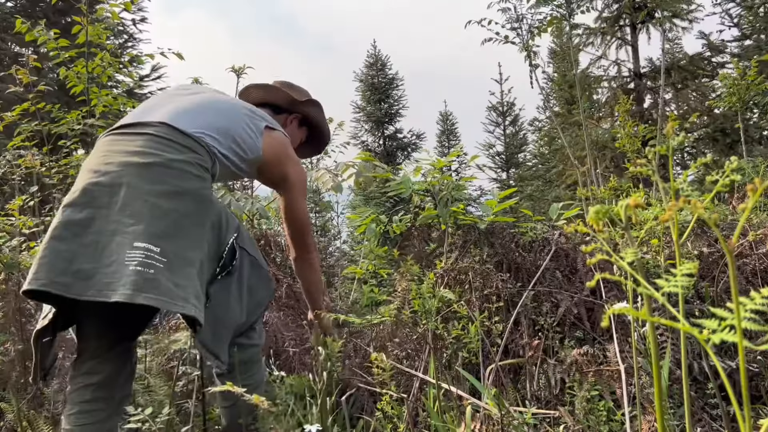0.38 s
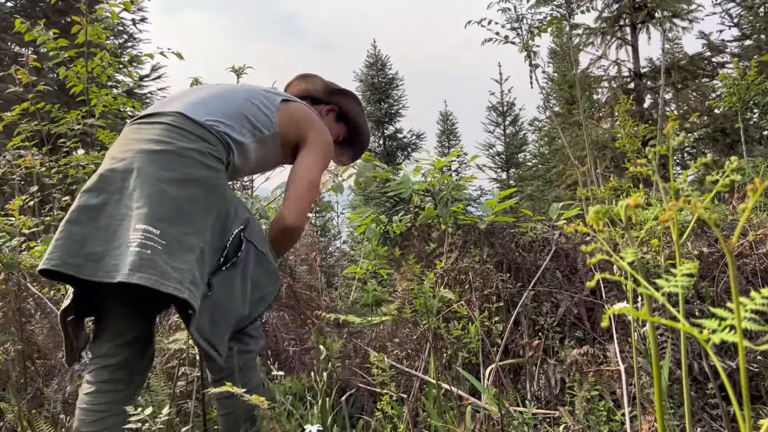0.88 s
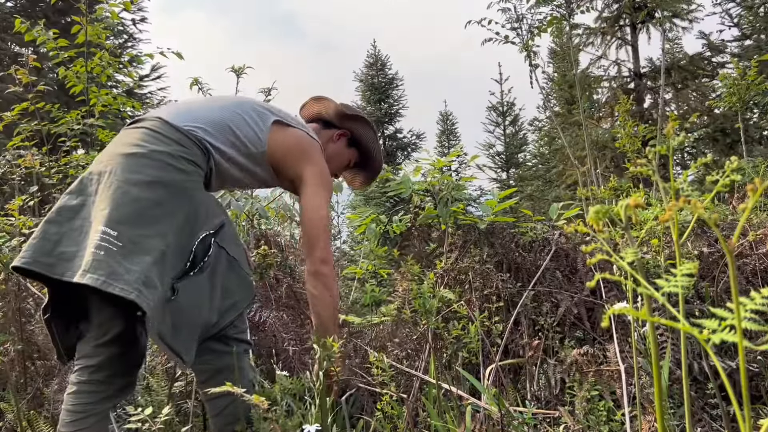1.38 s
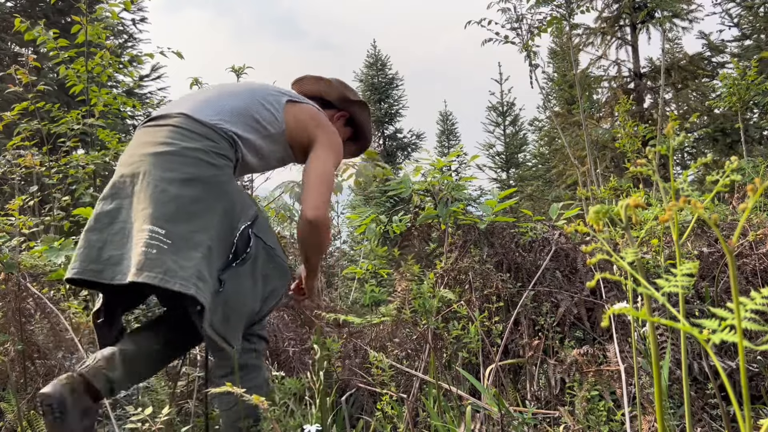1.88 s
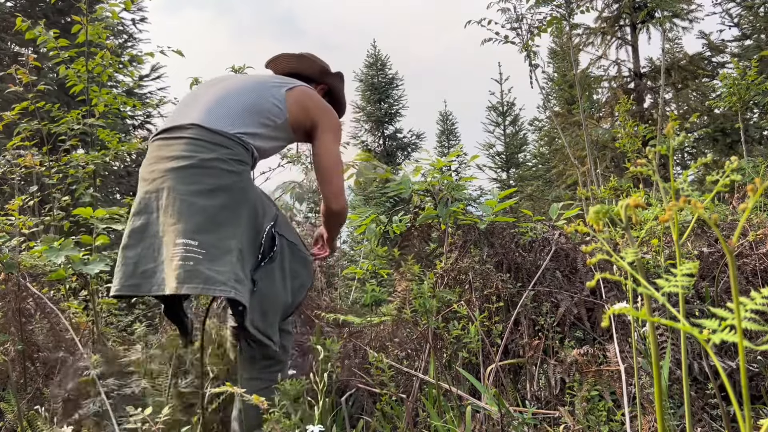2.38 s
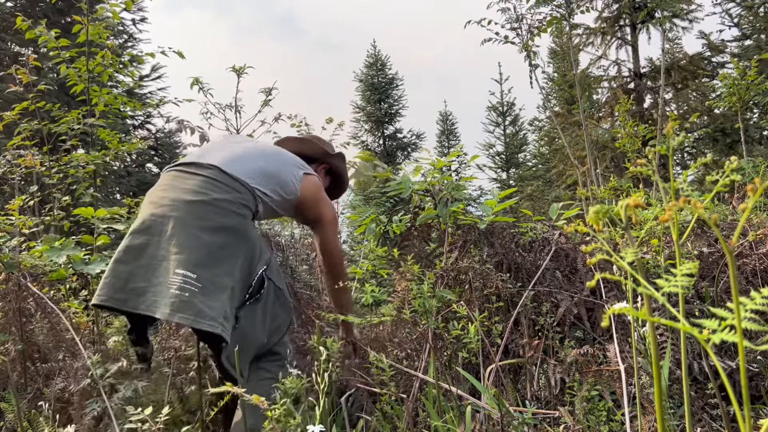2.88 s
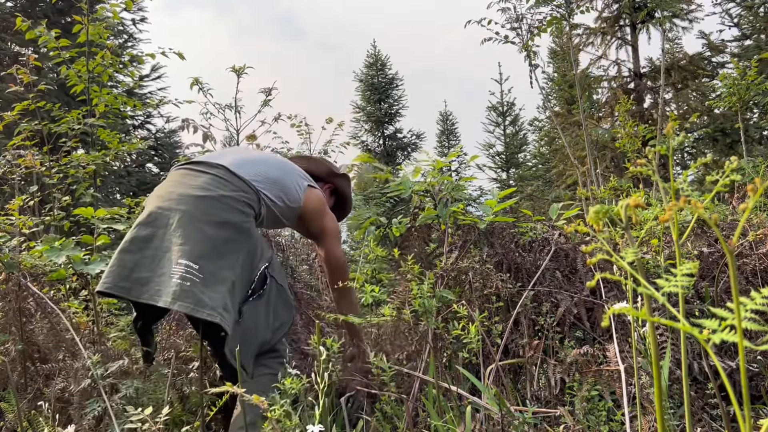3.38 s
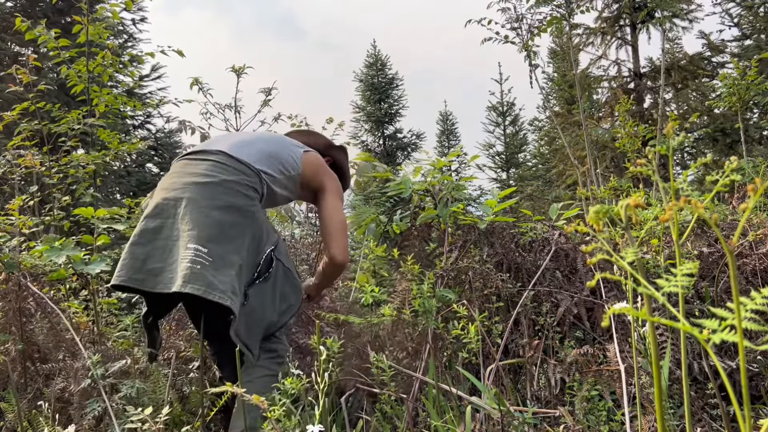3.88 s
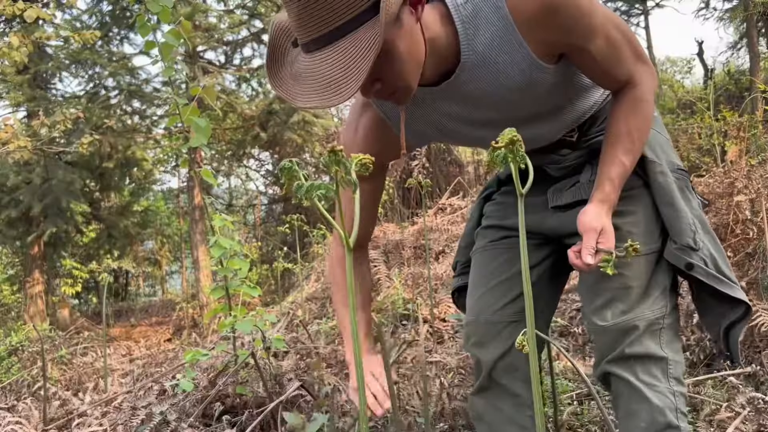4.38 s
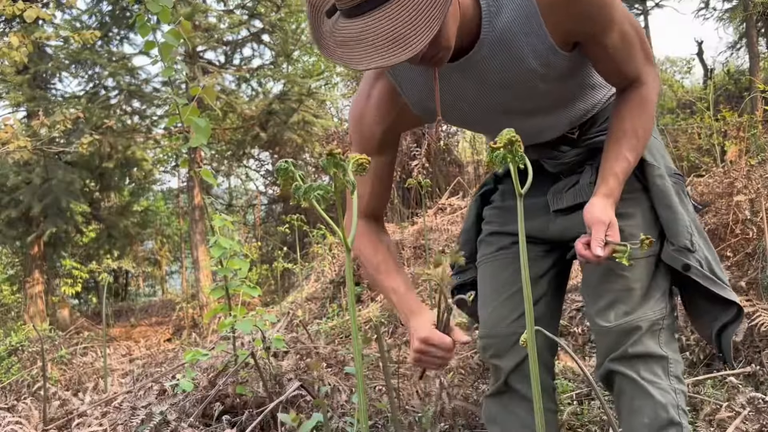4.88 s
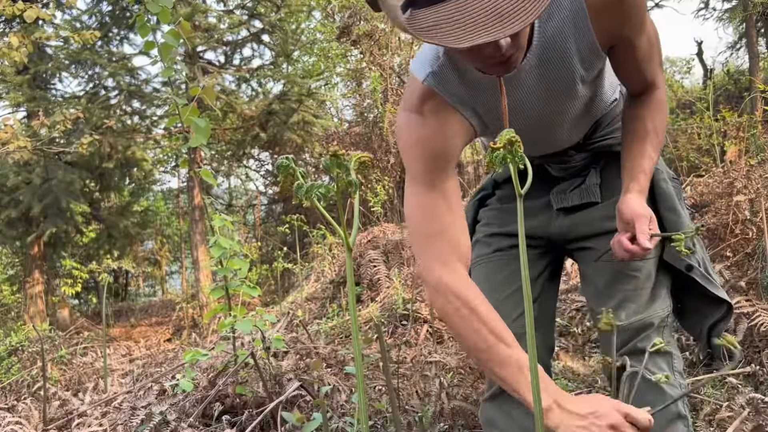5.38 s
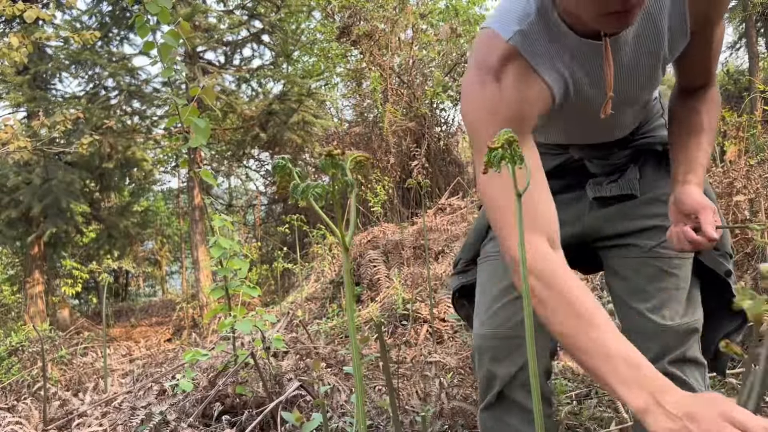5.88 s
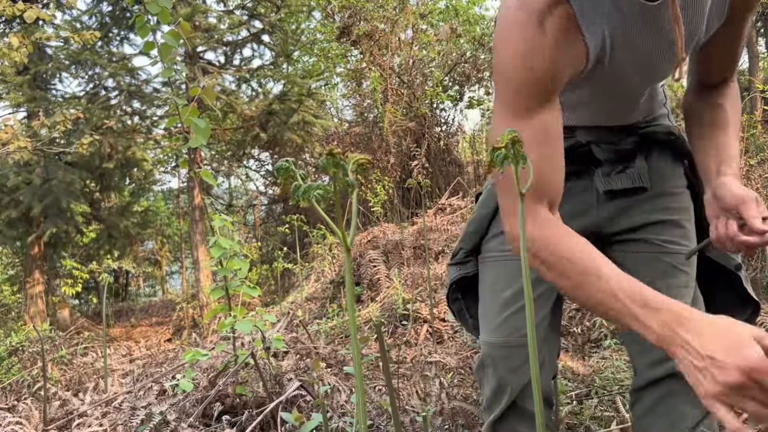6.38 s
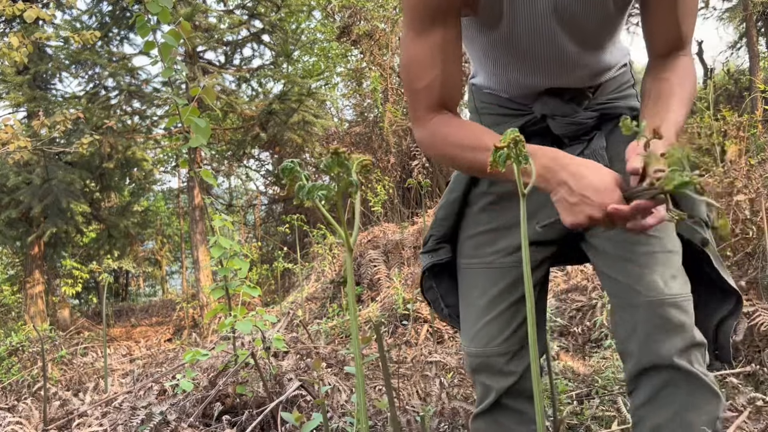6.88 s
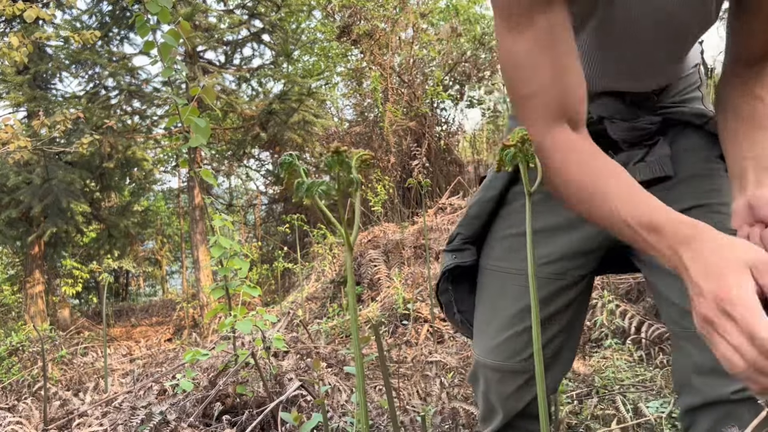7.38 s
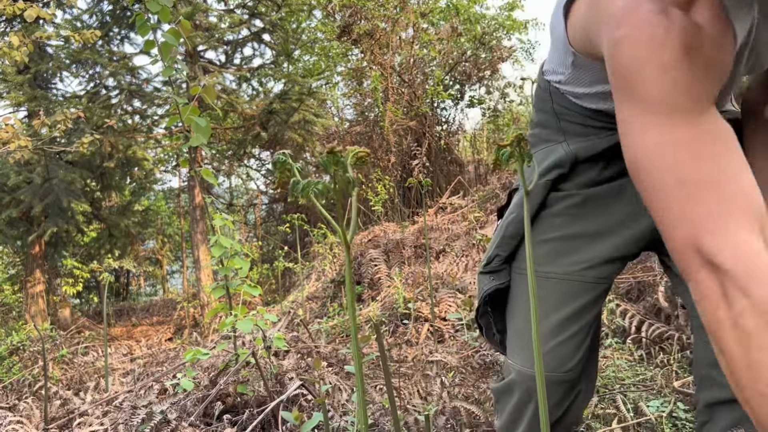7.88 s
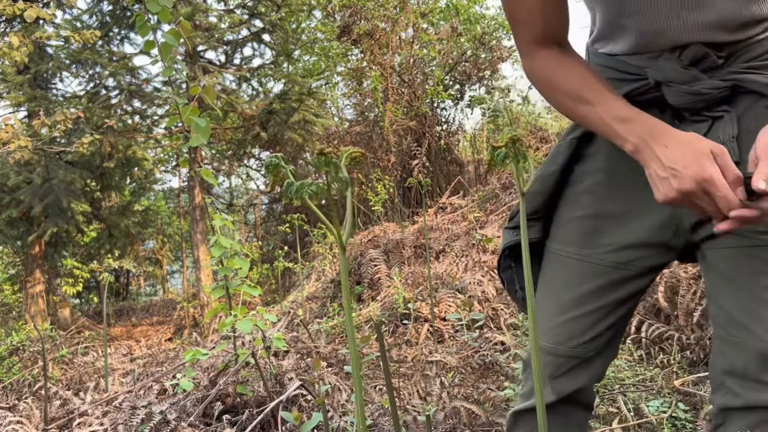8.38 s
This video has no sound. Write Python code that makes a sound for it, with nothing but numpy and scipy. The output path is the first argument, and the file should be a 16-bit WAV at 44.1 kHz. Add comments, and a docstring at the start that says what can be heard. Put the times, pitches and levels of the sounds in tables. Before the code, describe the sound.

Dry bracken rustles and crunches in uneven sweeps as someone picks stems, with sharp snaps and a few faint, distant bird chirps outdoors.

```python
"""Someone bends and steps through dry bracken on a hillside, picking stems, in about 8.5 s of still air.
From the start, low noise for air and summed sines for hum lie under faint rustle, sweeps and small snaps.
Hoarse whistles, noise narrowed round a gliding pitch, come from far birds, mostly before 2.8 s and from 4.1 to 5.3 s.
Sharp clicks with torn noise snap stems near 2.4 s, and hardest just after 4.5 s.
Sweeps of tiny noise puffs in fronds and crushed litter grow, peak near 7.1 s, then ease towards the end."""
import sys
import numpy as np
from scipy import signal
from scipy.fft import rfft, irfft, next_fast_len
from scipy.io import wavfile
from scipy.ndimage import uniform_filter1d

SR = 44100
rng = np.random.default_rng(int(sys.argv[2]) if len(sys.argv) > 2 else 0)


def undo_db(level):
    """Turn decibels back into plain size, where 20 dB means ten times bigger."""
    steps = np.asarray(level, float) / 20
    return 10 ** steps


def put_to_file(sound):
    """Save the sound as 16-bit audio at rate SR, in the file named by the first command-line argument."""
    columns = np.atleast_2d(sound).T  # one column per channel
    safe = np.clip(columns, -1, 1)
    whole_steps = np.round(safe * 32767)
    wavfile.write(sys.argv[1], SR, whole_steps.astype(np.int16))


N = 375291


def evened(x):
    """Scales to rms 1."""
    return x / np.sqrt(np.mean(x ** 2) + 1e-20)


def read(points, hz):
    """Reads a spectrum on a log-frequency axis."""
    f, value = np.transpose(points)
    return np.interp(np.log(hz + 1), np.log(f + 1), value)


def curve(rows, column, t):
    """Reads one column of a table at times t."""
    rows = np.array(rows)
    return np.interp(t, rows[:, 0], rows[:, column])


def add(mix, s, sound):
    """Mixes a sound in at time s."""
    part = mix[:, round(s * SR):][:, :sound.shape[1]]
    part += sound[:, :part.shape[1]]


def shaped(x, spectrum):
    """Filters by a spectrum."""
    size = next_fast_len(x.shape[1])
    gain = undo_db(read(spectrum, np.fft.rfftfreq(size, 1 / SR)))
    return irfft(rfft(x, size) * gain, size)[:, :x.shape[1]]


def resonate(x, hz, width_hz):
    """Shifts the pitch hz down to zero, smooths, and shifts back: a resonance of gain 1."""
    turn = np.exp(2j * np.pi * np.cumsum(hz * np.ones(x.shape[-1])) / SR)
    r = np.exp(-np.pi * width_hz / SR)
    smooth = signal.lfilter([1 - r], [1, -r], x / turn)
    return 2 * (turn * smooth).real


def pair(size, apart):
    """Two partly alike noises, as two close microphones hear one source."""
    a, b = rng.standard_normal((size, 2)).T
    return np.array([a + apart * b, a - apart * b])


def wander(top_hz):
    """Slow random drift of rms 1: 24 sines from 0.3 Hz up to top_hz."""
    t = np.arange(0, N + 256, 256) / SR
    phases = rng.random(24)
    rates_hz = np.geomspace(.3, top_hz, len(phases))
    slow = sum(np.sin(2 * np.pi * (f * t + p)) for f, p in zip(rates_hz, phases))
    return np.interp(np.arange(N) / SR, t, evened(slow))


# Partials of the hum: multiple of 50.1 Hz, level/dB rms
HUM_PARTIALS = [(1, -84), (2, -84), (3, -84), (5, -85), (6, -85), (10, -88.5), (13, -88)]


def hum():
    """A faint, steady electrical hum, alike in both ears: a sum of sines."""
    turns = 50.1 * np.arange(N) / SR
    return sum(undo_db(db) * np.sqrt(2) * np.sin(2 * np.pi * (k * turns + rng.random()))
               for k, db in HUM_PARTIALS)


# Colour of the air's stir: f/Hz, level/dB
AIR_COLOUR = [(20, -24), (45, 1.5), (100, -0.5), (200, -2), (400, -12), (800, -46)]
# Rise and fall of the air at the microphones: t/s, level/dB
AIR_LEVEL = [(0.0, -69), (0.19, -81), (0.62, -68.5), (0.87, -84), (0.99, -70), (1.42, -79), (2.15, -75),
             (2.35, -62.5), (2.84, -71), (3.39, -68.5), (4.07, -83.5), (4.71, -70), (4.83, -80),
             (5.43, -74), (6.2, -71), (6.63, -73), (7.23, -70), (7.51, -73), (7.85, -69.5), (8.51, -72)]


def air():
    """A low, smooth stir of air: filtered noise under a drifting level."""
    stir = evened(shaped(pair(size=N, apart=0.81), AIR_COLOUR))
    return stir * undo_db(curve(AIR_LEVEL, 1, np.arange(N) / SR))


# Glides of the far birds, one list a whistle: t/s, f/Hz, level/dB
WHISTLE_GLIDES = [
    [(.73, 2440, -64), (.77, 2400, -62), (.87, 2390, -73), (1.1, 2400, -69), (1.4, 2400, -74)],
    [(2.17, 3400, -54), (2.2, 2950, -55), (2.3, 2750, -53)],
    [(2.68, 2600, -61), (2.75, 2440, -60)],
    [(4.11, 4500, -63), (4.155, 5000, -63)],
    [(4.15, 5740, -61), (4.2, 6140, -66), (4.25, 6100, -95)],
    [(4.31, 6150, -82), (4.325, 6200, -54), (4.35, 6200, -58), (4.37, 5960, -60)],
    [(4.375, 5000, -54), (4.41, 5050, -53), (4.44, 4860, -57), (4.48, 4900, -66)],
    [(4.41, 5700, -57), (4.45, 5970, -51.5), (4.49, 6350, -60)],
    [(4.81, 5300, -59), (4.85, 5200, -58), (4.88, 4930, -55), (4.915, 5440, -53), (4.96, 5200, -63),
     (5.02, 5300, -74)],
    [(4.88, 5900, -65), (4.91, 6300, -58), (4.95, 5900, -68)],
    [(5.045, 5500, -44), (5.065, 5500, -54), (5.12, 5440, -65), (5.165, 5850, -59), (5.26, 6400, -56)],
    [(5.05, 4600, -60), (5.1, 4700, -67), (5.14, 4700, -56), (5.165, 4700, -62)],
]


def whistle(rows):
    """A far bird: its tone arrives blurred by leaves into a narrow band of noise."""
    t = np.arange(rows[0][0], rows[-1][0], 1 / SR)
    hz = curve(rows, 1, t)
    noise = pair(size=len(t), apart=0.8)
    tone = resonate(resonate(noise, hz, 400), hz, 400)
    return t[0], evened(tone) * undo_db(curve(rows, 2, t)) * signal.windows.tukey(len(t), .2)


# Stem breaks: t/s, crack level/dB rms over the break, ring f/Hz, thud level/dB rms over the break
STEM_SNAPS = [(0.3217, -54.0, 4300.0, -71), (0.3942, -52.0, 3950.0, -68), (0.4672, -51.5, 3330.0, -66),
              (0.576, -47.5, 3350.0, -65), (1.5074, -53.5, 3260.0, -72), (1.8696, -56.0, 5520.0, -83),
              (2.0382, -58.0, 3860.0, -76), (2.1068, -49.0, 4880.0, -72), (2.1577, -45.0, 4260.0, -66),
              (2.33, -43.0, 3600.0, -62), (2.4236, -38.5, 2900, -44), (2.4564, -41.5, 2970.0, -47),
              (2.472, -47.0, 4390.0, -50), (2.574, -46.5, 5240.0, -69), (3.1415, -56.0, 3480.0, -69),
              (3.2821, -49.0, 3230.0, -61), (3.3067, -43.5, 3690.0, -67), (3.3594, -43.0, 3080.0, -60),
              (3.6595, -45.0, 3640.0, -74), (4.1807, -46.0, 5490.0, -88), (4.3737, -44.0, 3830.0, -65),
              (4.5392, -30.5, 3600, -62), (4.6537, -40.0, 3050.0, -64), (4.6912, -29.5, 4920.0, -69),
              (4.7319, -45.0, 4440.0, -68), (4.7545, -45.0, 4090.0, -68), (5.2505, -50.5, 3900.0, -73),
              (5.3617, -36.5, 3190.0, -66), (5.4202, -37.5, 4030.0, -62), (5.6417, -43.0, 3860.0, -56),
              (5.6964, -39.0, 3890.0, -64), (5.7141, -34.0, 2000, -45), (5.9062, -52.0, 2890.0, -74),
              (5.9902, -45.0, 3240.0, -65), (6.1617, -42.0, 2600, -60), (6.8817, -42.0, 4200.0, -80),
              (7.0193, -43.0, 3830.0, -72), (7.0842, -32.5, 2400, -47), (7.123, -36.0, 4240.0, -52),
              (7.1889, -41.0, 2370.0, -46), (7.2334, -39.0, 3300.0, -65), (7.6186, -51.0, 3400.0, -65),
              (7.646, -51.0, 3660.0, -70), (7.7892, -44.5, 1700, -54), (7.8427, -43.0, 1200, -42),
              (8.0407, -47.5, 3630.0, -70), (8.4819, -48.0, 5070.0, -67)]
# Colour of a crack about its ring: multiple of the ring f, level/dB
CRACK_COLOUR = [(.2, -45), (.45, -18), (.85, -3), (1, 0), (1.2, -3), (2.2, -14)]
# Where a crack's treble ends: f/Hz, level/dB
CRACK_TREBLE = [(7000, -2), (10000, -2), (12500, -40)]


def snap(s, crack_db, ring_hz, thud_db):
    """Fibres tear for a moment, the stem breaks with one sharp click, and splinters die away."""
    t = np.arange(-400, 1200) / SR
    tearing = np.exp(-abs(t) / np.where(t < 0, .0011, .0013))
    splinters = .06 * np.exp(-abs(t) / 0.011) * (t > 0)
    click = 1.5 * (t == 0)
    drive = .32 * (tearing + splinters) * pair(size=len(t), apart=1.1) + click
    ring = shaped(drive, [(share * ring_hz, db) for share, db in CRACK_COLOUR])
    crack = shaped(ring + .3 * shaped(drive, FROND_COLOUR), CRACK_TREBLE)
    thud = resonate(resonate(np.gradient(drive, axis=1), 660, 760), 660, 760)
    during = abs(t) < .003  # the break lasts 6 ms; levels hold over it
    crack = undo_db(crack_db) * crack / crack.mean(axis=0)[during].std()
    thud = undo_db(thud_db) * thud / thud.mean(axis=0)[during].std()
    return s + t[0], crack + thud


# Sweeps of a hand or steps of a foot: peak t/s, frond crackle level/dB in its middle band,
# swell t/s per 10 dB, fade t/s per 10 dB, litter crush level/dB over that crackle
BODY_SWEEPS = [(.569, -54, .13, .035, -9), (.621, -58, .03, .06, -8), (1.754, -57.5, .11, .08, -9),
               (1.871, -65, .04, .04, -6), (2.108, -61, .04, .025, -6), (2.272, -47, .055, .3, -13),
               (2.45, -47.5, .17, .065, -5), (2.585, -57.5, .03, .2, -8), (3.288, -57, .11, .07, -8),
               (3.367, -50.5, .015, .06, -10), (3.664, -59, .2, .12, -7), (3.76, -62, .1, .04, -7),
               (3.954, -68.5, .08, .1, -3), (4.13, -65, .025, .14, -7), (4.355, -58.5, .025, .09, -10),
               (4.54, -55.5, .14, .17, -11), (4.657, -57, .03, .02, -10), (4.749, -55, .1, .085, -12),
               (5.248, -55.5, .11, .06, -16), (5.375, -48, .06, .15, -13), (5.43, -52, .04, .05, -9),
               (5.5, -51, .1, .05, -8), (5.712, -48.5, .13, .05, -6), (5.979, -59, .13, .2, -9),
               (6.168, -54, .06, .05, -10), (6.223, -49.5, .1, .07, -12), (6.79, -60, .12, .4, -5),
               (6.964, -47, .022, .22, -14), (7.04, -47.5, .08, .1, -12), (7.091, -40.5, .05, .1, -7.5),
               (7.189, -43, .06, .025, -5), (7.236, -46, .03, .06, -9), (7.35, -59, .15, .05, -2),
               (7.63, -58, .09, .15, -7), (7.792, -49.5, .055, .08, -5), (8.037, -60, .15, .08, -8),
               (8.199, -61.5, .06, .12, -5), (8.378, -58, .13, .12, -7)]
# Faint rustle between sweeps: t/s, frond crackle level/dB in its middle band,
# brightness of all frond crackle/dB per octave of f + 500 Hz, litter crush level/dB over that crackle
FAINT_RUSTLE = [(0, -66.5, 2, -1), (.4, -66, 0, -2), (.81, -70, -2.5, 0), (1.04, -63, -1, -3.5),
                (1.3, -65, 0, -3), (1.44, -69.5, -4, -1), (1.482, -88, -4, -4), (1.53, -67, -2, -4),
                (1.8, -66.5, 1.5, -3), (2.05, -69, -1, -1), (2.45, -66, 2, -3), (2.8, -64, .5, -4),
                (3.04, -61, 0, -6), (3.13, -69.5, .5, -1), (3.6, -66, 0, -4), (3.85, -74, -2, -4),
                (4.08, -80, -5, -1), (4.3, -76, -2.5, -1), (4.6, -72, 3, -7), (5.02, -77, 0, -2),
                (5.25, -70, 2.5, -4), (5.6, -61, 0, -6), (6.1, -61, 2.5, -7), (6.62, -65.5, 0, -4.5),
                (7.0, -66, 1, -3), (7.45, -67, .5, -1), (8.0, -67.5, 1.5, 0), (8.51, -68, 3.5, 0)]


def effort():
    """Levels in dB of fronds and litter: every sweep swells and fades over the faint rustle."""
    t = np.arange(0, N + 64, 64) / SR
    s, peak_db, swell_s, fade_s, crush_db = np.transpose(BODY_SWEEPS)[:, :, None]
    sweeps = undo_db(peak_db - 10 * abs(t - s) / np.where(t < s, swell_s, fade_s)) ** 2
    rustle = undo_db(curve(FAINT_RUSTLE, 1, t)) ** 2
    fronds = rustle + sweeps.sum(axis=0)
    rustle_crush = rustle * undo_db(curve(FAINT_RUSTLE, 3, t)) ** 2
    litter = rustle_crush + (sweeps * undo_db(crush_db) ** 2).sum(axis=0)
    return [np.interp(np.arange(N) / SR, t, 10 * np.log10(power)) for power in (fronds, litter)]


def crackle(per_s, spread_db, grain_s, hiss):
    """Envelope of many tiny breaks, a few large, each a short puff, over a smooth hiss."""
    size = undo_db(spread_db * np.minimum(rng.exponential(1, N), 5))
    breaks = size * (rng.random(N) < per_s / SR)
    t = np.arange(-400, 400) / SR
    puff = np.exp(-abs(t) / np.where(t < 0, 0.11 * grain_s, grain_s))
    puffs = evened(signal.oaconvolve(breaks, puff, "same"))
    return np.sqrt((hiss ** 2 + puffs ** 2) / (hiss ** 2 + 1))


# Side colour, treble spreading wider than bass: f/Hz, level/dB
SPREAD_COLOUR = [(100, -1.5), (700, -2.5), (2500, 1), (8000, 0.5)]


def coloured(grain, spectrum, level_db, patchy_db, tilted=0):
    """Noise under a grain envelope, shaped by a spectrum with drifting patches and spread over two ears."""
    noise = grain * rng.standard_normal((2, N))
    hz, t, (a, b) = signal.stft(noise, SR, nperseg=256, noverlap=192)
    patches = rng.standard_normal((len(t), len(hz))).T
    patches = uniform_filter1d(patches, size=4, axis=0)  # across pitch
    patches = evened(uniform_filter1d(patches, size=30, axis=1))  # across time
    side = b * undo_db(read(SPREAD_COLOUR, hz)[:, None])
    octaves = np.log2((hz[:, None] + 500) / 3300)  # the tilt turns about 2.8 kHz
    tilt_db = tilted * octaves * curve(FAINT_RUSTLE, 2, t)
    z = np.array([a + side, a - side])
    z *= undo_db(read(spectrum, hz)[:, None] + patchy_db * patches + tilt_db)
    ears = signal.istft(z, SR, nperseg=256, noverlap=192)[1][:, :N]
    return ears / ears.mean(axis=0).std() * undo_db(level_db)


# Colour of crackling fronds: f/Hz, level/dB per Hz
FROND_COLOUR = [(500, -58.5), (1200, -8.5), (2000, -1.5), (2900, 0), (4200, -2), (5800, -2), (7000, -9.5),
                (9000, -9)]
# Colour of crushed litter: f/Hz, level/dB per Hz
LITTER_COLOUR = [(60, -17), (200, 0), (400, -0.5), (800, 0.5), (1400, -1.5), (2500, -26)]


def bracken(fronds_db, litter_db):
    """Fronds and litter share the same breaks; each follows the body's effort in its own way."""
    hiss = undo_db(5.5 - 0.27 * (fronds_db + 52))  # hard sweeps crackle, gentle ones hiss
    breaks = crackle(per_s=300, spread_db=4.0, grain_s=.0018, hiss=hiss)
    # the whole crackle is a little louder than its middle band
    fronds = coloured(breaks, FROND_COLOUR, fronds_db + 3.7, patchy_db=1.0, tilted=1)
    litter = coloured(breaks + 0.18, LITTER_COLOUR, litter_db, patchy_db=0.5)
    return fronds + litter


# Where the person stands: t/s, left over right level/dB
PERSON_LEAN = [(0, .1), (4.2, .1), (4.8, -1.6), (7.2, -1.2), (7.7, .1), (8.5, -.2)]


def scene():
    """All sources in the open, with no walls; bracken and snaps lean with the person."""
    fronds_db, litter_db = effort()
    mix = bracken(fronds_db, litter_db)
    for row in STEM_SNAPS:
        add(mix, *snap(*row))
    lean_db = curve(PERSON_LEAN, 1, np.arange(N) / SR)
    mix = mix * undo_db(lean_db * np.array([[.5], [-.5]])) + air() + hum()
    for rows in WHISTLE_GLIDES:
        add(mix, *whistle(rows))
    return mix


def low_pass(x):
    """Removes everything above the highest recorded frequency."""
    return signal.sosfilt(signal.butter(12, 10040, fs=SR, output="sos"), x)


# Dull response of the microphones: f/Hz, level/dB
MICROPHONE_COLOUR = [(5500, 0.5), (7000, -0.5), (8000, -11.5), (9000, -18.5), (10000, -34.5), (11000, -78)]


def record(dry):
    """A dull microphone pair with a steady offset, its image ever widening and narrowing."""
    left, right = shaped(dry, MICROPHONE_COLOUR)
    side_gain_db = -8 + 2.5 * wander(top_hz=8)
    mid = (left + right) / 2
    side = (left - right) / 2 * undo_db(side_gain_db)
    offset = .00136  # of full scale
    mix = np.array([mid + side, mid - side]) + offset
    return low_pass(mix)


dry = scene()
out = record(dry)
put_to_file(out)
```